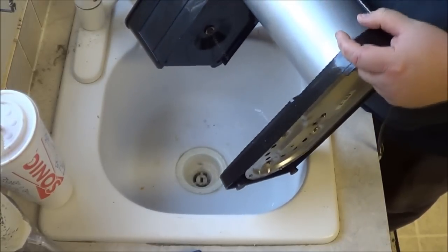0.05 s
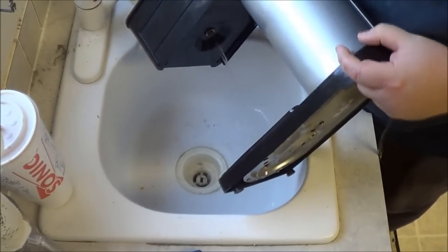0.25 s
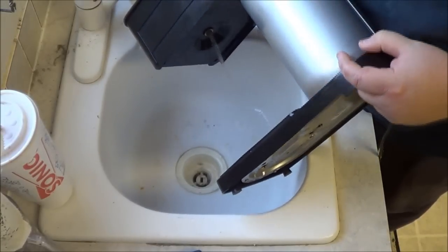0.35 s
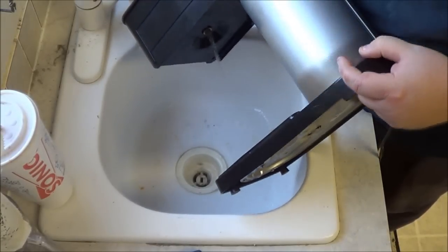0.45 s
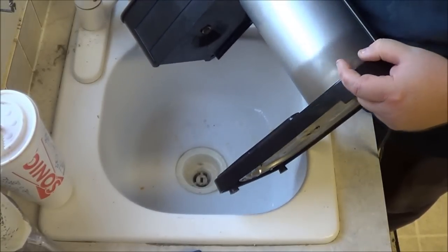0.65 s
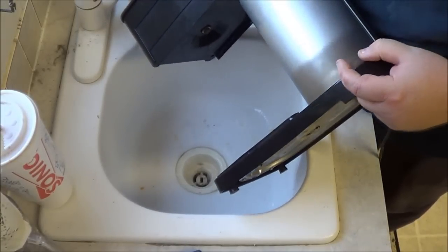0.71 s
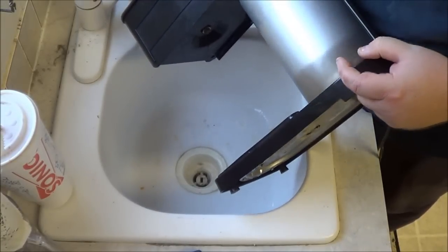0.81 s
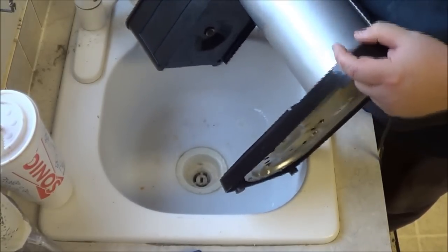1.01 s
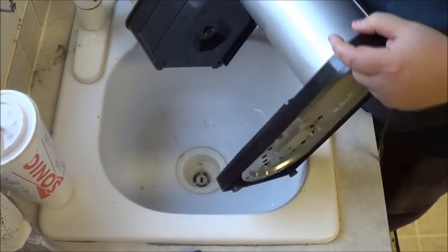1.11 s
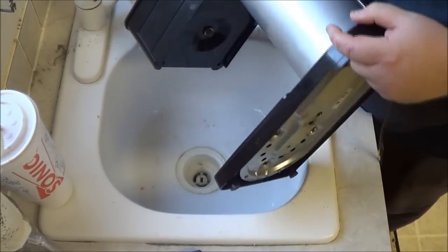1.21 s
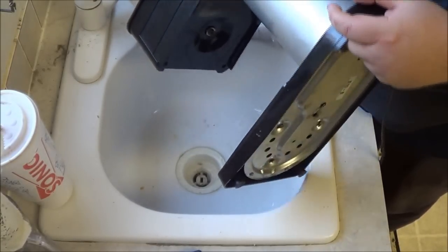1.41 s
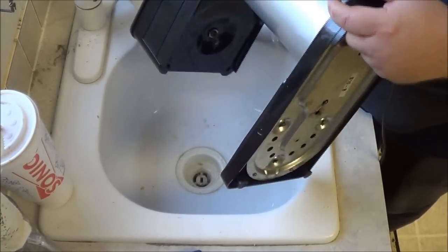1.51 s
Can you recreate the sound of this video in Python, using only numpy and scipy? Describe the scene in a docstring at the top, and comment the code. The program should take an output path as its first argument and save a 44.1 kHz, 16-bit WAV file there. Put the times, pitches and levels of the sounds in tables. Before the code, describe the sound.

A thin trickle of water drips into a kitchen sink as a plastic appliance is bumped.

```python
"""A kitchen sink, the stereo microphone close to the basin; room air and appliance hum lie behind it.
After two faint scuffs, water dribbles from a tilted coffee maker: from 0.2 s drops tick on the basin
and trapped air bubbles chirp upward. The trickle thickens, then thins after 0.8 s. The plastic housing
bumps as it is handled, hardest near 1.2 s, and a few faint drips follow. Basin and kitchen throw
the water's sound back; the bumps echo in the kitchen only."""
import sys
import numpy as np
from scipy import signal
from scipy.fft import rfft, irfft
from scipy.io import wavfile
from scipy.ndimage import uniform_filter1d

SR = 44100
rng = np.random.default_rng(int(sys.argv[2]) if len(sys.argv) > 2 else 0)


def wav_out(sig):
    """Save sig, one row per channel (or a flat mono array), as 16-bit PCM at SR to the path in sys.argv[1]."""
    wavfile.write(sys.argv[1], SR, np.round(np.clip(np.atleast_2d(sig).T, -1, 1) * 32767).astype(np.int16))


N = 68355


def amp(db):
    """Decibels to gain."""
    return 10 ** (np.asarray(db) / 20)


def unit(x):
    """Scales to rms 1."""
    return x / np.sqrt(np.mean(x ** 2) + 1e-20)


def read(points, hz):
    """Reads a table on a log-frequency axis."""
    f, value = np.transpose(points)
    return np.interp(np.log(hz + 1), np.log(f + 1), value)


def colour(x, points):
    """Gives a signal the spectrum of a table, at rms 1."""
    return unit(irfft(rfft(x) * amp(read(points, np.fft.rfftfreq(N, 1 / SR))), N))


def pair(a, b, alike):
    """Left and right channels of given likeness from two unrelated signals."""
    alike = np.clip(alike, 0, 1)
    mid, side = np.sqrt((1 + alike) / 2) * a, np.sqrt((1 - alike) / 2) * b
    return np.array([mid + side, mid - side])


def convolve(x, response):
    """Plays a mono sound through a stereo response."""
    return signal.fftconvolve(x[None], response, axes=1)[:, :N]


def play(table, source):
    """Sounds each row of an event table at the time in its first column."""
    mix = np.zeros(N)
    for start_s, *row in table:
        sound = source(*row)
        part = mix[round(start_s * SR):][:len(sound)]
        part += sound[:len(part)]
    return mix


# Spectrum of the kitchen's air (frequency [Hz], relative level [dB])
AIR_SPECTRUM = [(15, -45), (30, -22), (65, -16), (130, -9), (250, -10), (390, -7), (460, -4.5),
                (530, -12.5), (650, -10), (850, -13.5), (2000, -19.5), (4600, -24), (16000, -28.5)]
# The air across the microphone's two channels (frequency [Hz], likeness [0-1])
AIR_LIKENESS = [(50, .99), (300, 0.84), (1000, 0.22), (4000, 0.34), (12000, 1)]


def room_air(level_db=-47):
    """Room tone: a soft, low rush all around the microphone."""
    likeness = read(AIR_LIKENESS, np.fft.rfftfreq(N, 1 / SR))
    noise = irfft(pair(*rfft(rng.standard_normal((2, N))), likeness), N)
    return amp(level_db) * colour(noise, AIR_SPECTRUM)


# Tones of the appliances in the background (frequency [Hz], level [dB])
HUM_TONES = [(59.2, -53.5), (120, -72), (240, -61), (382, -70.5), (461, -52), (638, -62.5), (15734, -66.5)]


def appliance_hum(waver_depth=0.22, waver_hz=6):
    """Appliances hum in the centre of the image, each tone wavering slightly in level."""
    hz, t = np.fft.rfftfreq(N, 1 / SR), np.arange(N) / SR
    hum = np.zeros(N)
    for tone_hz, db in HUM_TONES:
        waver = unit(irfft(rfft(rng.standard_normal(N)) * np.exp(-hz / waver_hz), N))
        tone = np.sqrt(2) * np.sin(2 * np.pi * (tone_hz * t + rng.random()))
        hum += amp(db) * (1 + waver_depth * waver) * tone
    return hum


def echoes(t60, likeness, delay_s):
    """Dense, evenly coloured reflections that die band by band."""
    hz, t, noise = signal.stft(rng.standard_normal((2, SR // 2)), SR, nperseg=128)
    tail = signal.istft(noise * amp(-60 * t / read(t60, hz)[:, None]), SR, nperseg=128)[1]
    for _ in range(3):  # even out the colour
        spectrum = rfft(tail, SR)
        spectrum /= np.sqrt(uniform_filter1d(abs(spectrum) ** 2, size=400, axis=1))
        tail = irfft(spectrum, SR)[:, :SR // 2]
    tail = irfft(pair(*spectrum, read(likeness, np.fft.rfftfreq(SR, 1 / SR))), SR)[:, :SR // 2]
    return np.pad(tail, ((0, 0), (round(delay_s * SR), 0)))


# Reverberation of the kitchen (frequency [Hz], time to fall 60 dB [s])
KITCHEN_DECAY = [(200, 0.33), (1000, 0.23), (5500, 0.3), (9000, 0.33), (14000, 0.057)]
# That reverberation across the two channels (frequency [Hz], likeness [0-1])
KITCHEN_LIKENESS = [(200, 0.87), (1500, 0.45), (5000, 0.39), (12000, 0.99)]


def kitchen_echoes():
    """The walls, farther from the microphone, answer with a short, wide tail."""
    return echoes(KITCHEN_DECAY, KITCHEN_LIKENESS, delay_s=0.0071)


# Reverberation inside the basin (frequency [Hz], time to fall 60 dB [s])
BASIN_DECAY = [(800, 0.03), (3000, 0.041), (7000, 0.044), (14000, 0.014)]
# That reverberation across the two channels (frequency [Hz], likeness [0-1])
BASIN_LIKENESS = [(800, 0.92), (2000, 0.9), (5000, 0.94), (9000, 0.87), (14000, 1)]
# Strength of the basin's reflections (frequency [Hz], gain [dB])
BASIN_COLOUR = [(900, -5), (2500, 2.5), (16000, 3)]


def basin_echoes():
    """The basin's sides, close by, throw back a bright, narrow reflection almost at once."""
    tail = echoes(BASIN_DECAY, BASIN_LIKENESS, delay_s=0.0008)
    gain = amp(read(BASIN_COLOUR, np.fft.rfftfreq(SR, 1 / SR)))
    return irfft(rfft(tail, SR) * gain, SR)[:, :SR // 2]


# Dull thuds of handling (time [s], level [dB])
HANDLING_THUDS = [(0.425, -45), (0.710, -47), (1.226, -27.5)]


def thud(db, hz=46.8, rise_s=0.012, decay_s=0.045):
    """A few heavily damped swings of the whole machine."""
    t = np.arange(SR // 3) / SR
    envelope = np.exp(-t / decay_s) * (1 - np.exp(-t / rise_s))
    return -amp(db) * envelope * np.sin(2 * np.pi * hz * t)


# Modes of the plastic housing (frequency [Hz], relative level [dB], time to fall 60 dB [s])
HOUSING_MODES = [(244.4, -3.5, 0.32), (350, 4.5, 0.04), (425.6, -3, 0.12), (553, 1, 0.052),
                 (632.6, -1.5, 0.086), (786, -16, 0.13), (1140, -14.5, 0.07)]
# Bumps on it (time [s], push pitch [Hz], push level [dB], push decay [s], ring level [dB])
HOUSING_BUMPS = [ (0.4480, 313, -42, 0.019, -50), (0.6000, 219, -47, 0.021, -54),
                 (0.6820, 372, -23, 0.0086, -36), (0.7200, 310, -35, 0.018, -39.5),
                 (0.7630, 405, -32.5, 0.014, -48), (1.2265, 133, -17.5, 0.0063, -26),
                 (1.2410, 232.2, -19.5, 0.013, -34.5)]


def bump(push_hz, push_db, push_s, ring_db, rise_s=0.0014):
    """A soft push on the plastic housing, which then rings in its modes."""
    t = np.arange(SR // 3) / SR
    push = np.sin(2 * np.pi * push_hz * t) * np.exp(-t / push_s)
    ring = sum(amp(db - 60 * t / t60) * np.sin(2 * np.pi * hz * t) for hz, db, t60 in HOUSING_MODES)
    return -(amp(push_db) * push + amp(ring_db) * ring) * (1 - np.exp(-t / rise_s))


def tick(hz, octaves, db, puff_weight, puff_s):
    """A small contact: a sharp click and a dying puff of noise, in one band."""
    t, f = np.arange(4096) / SR, np.fft.rfftfreq(4096, 1 / SR)
    band = np.exp(-.5 * (np.log2((f + 1) / hz) / octaves) ** 2)
    click = np.roll(irfft(band), 12)  # a short lead-in to the peak
    puff = unit(irfft(band * rfft(rng.standard_normal(len(t))))) * np.exp(-t / puff_s)
    return amp(db) * (click / click.max() + puff_weight * puff / 2)[:len(t) // 2]


# Scuffs (time [s], centre [Hz], width [octaves], level [dB], rasp weight [-], rasp decay [s])
HOUSING_SCUFFS = [ (0.0600, 1570, 3.7, -46.5, 0.82, 0.024), (0.1300, 1700, 0.81, -36.5, 0.48, 0.0032),
                  (1.1610, 2600, 0.24, -38, 0.33, 0.012), (1.1790, 1510, 0.16, -34, 1.2, 0.0053),
                  (1.2060, 1340, 0.56, -40.5, 0.9, 0.064), (1.2285, 1190, .85, -27, 0.24, 0.0036)]


def scuffs():
    """The housing scuffs as it is handled: faint clicks, each with a brief rasp."""
    return play(HOUSING_SCUFFS, tick)


# Course of the thin trickle (time [s], relative splatter level [dB], relative spray level [dB])
TRICKLE_LEVELS = [(0, -48, -56.5), (.19, -45.5, -53), (.38, -43.5, -50), (.45, -35, -44), (.54, -41, -51),
                  (.64, -39, -46), (0.748, -38.5, -40), (.81, -73, -72), (.93, -72, -49), (1.02, -65, -72),
                  (1.55, -65, -75)]
# Its dull splatter (frequency [Hz], relative level [dB])
SPLATTER_SPECTRUM = [(60, -12), (150, 1), (260, -3.5), (600, -0.5), (1100, -7.5), (2200, -16), (5000, -35)]
# Its fine spray (frequency [Hz], relative level [dB])
SPRAY_SPECTRUM = [(1000, -1), (3000, -3), (6500, -1.5), (11000, -4), (16000, -14)]


def trickle(splatter_per_s=1400, spray_per_s=1000, spread_db=4.0):
    """Countless tiny impacts in the basin: a dull splatter and a sparser, fine spray."""
    times, splatter_db, spray_db = np.transpose(TRICKLE_LEVELS)
    layers = (splatter_db, SPLATTER_SPECTRUM, splatter_per_s), (spray_db, SPRAY_SPECTRUM, spray_per_s)
    water = np.zeros(N)
    for db, spectrum, per_s in layers:
        sizes = amp(spread_db * np.minimum(rng.exponential(1, N), 4))
        signs = rng.choice([-1, 1], N)
        impacts = sizes * signs * (rng.random(N) < per_s / SR)
        water += amp(np.interp(np.arange(N) / SR, times, db)) * colour(impacts, spectrum)
    return water / 2


# Drops (time [s], centre [Hz], width [octaves], level [dB], spray weight [-], spray decay [s])
BASIN_DROPS = [ (0.2058, 1690, 0.82, -26.5, .4, 0.0045), (0.2666, 4200, 1.2, -23, 0.77, .003),
               (0.2668, 10470, 0.2, -15.5, 0.33, 0.0015), (0.2740, 6450, 0.27, -28, .5, 0.0031),
               (0.4120, 2960, 1.31, -18, 0.65, 0.0018), (0.4480, 6060, 1.6, -32, 0.38, 0.0029),
               (0.4645, 11200, 0.65, -15.5, 0.92, 0.00067), (0.4865, 8300, 1.7, -21.5, .3, 0.008),
               (0.5025, 11300, 0.4, -21, 0.41, 0.0079), (0.5562, 7400, 0.58, -13, 0.55, 0.0017),
               (0.5730, 8450, 0.78, -24.5, .4, 0.0034), (0.5830, 8100, 0.48, -17, 0.56, 0.0058),
               (0.5996, 9200, 0.21, -7.5, .13, 0.002), (0.6090, 2660, 3.6, -22.5, 0.42, 0.014),
               (0.6180, 10100, 0.69, -9.5, 0.46, 0.001), (0.6820, 9700, 0.57, -15.5, 0.21, 0.0037),
               (0.7038, 10500, .45, -32, .3, .003), (0.7222, 10300, 0.71, -21, 0.086, 0.0022),
               (0.7255, 3500, 0.49, -20, 0.28, 0.012), (0.7262, 7370, 0.26, -17, 0.18, 0.0026),
               (0.7428, 9500, 1.3, -46, .2, .002), (0.7630, 10000, .35, -17.5, 1, 0.00085),
               (0.8722, 9600, 0.52, -18.5, .15, 0.0013), (0.8850, 7700, 0.99, -17, .3, 0.0011),
               (0.9052, 9000, 0.74, -17.5, 0.094, 0.0015), (0.9882, 13500, .2, -31, 0.27, 0.0015),
               (1.1212, 12000, 0.19, -32, .3, .0015), (1.1570, 5900, 3.3, -26.5, 0.47, 0.0016),
               (1.1805, 5960, .35, -33, .4, 0.0022), (1.5072, 5370, 0.31, -34, 0.25, .002),
               (1.5342, 6900, 1.1, -31, .4, 0.0022)]


def drops():
    """Drops land close to the microphone, each with a tick and a puff of spray."""
    return play(BASIN_DROPS, tick)


# Bubbles (time [s], start pitch [Hz], glide target [Hz], glide [s], swell [s], decay [s], level [dB])
AIR_BUBBLES = [ (0.2055, 828, 1188, 0.024, 0.00158, .011, -21.5),
               (0.2724, 1180, 4220, 0.0064, 0.0034, 0.0035, -19.5),
               (0.2726, 1020, 1800, 0.0037, 0.00052, 0.0022, -21.5),
               (0.4935, 5650, 6900, 0.0048, 0.0017, 0.0025, -28.5),
               (0.7222, 1850, 6350, 0.0049, .0033, .0014, -7.5),
               (0.7622, 2015, 2280, 0.0047, 0.00093, 0.0013, -18.5),
               (0.7652, 1800, 5330, 0.0031, 0.0015, 0.0021, -17),
               (0.8094, 2000, 7550, 0.003, 0.0021, 0.00089, -5.5),
               (0.8718, 7400, 9120, 0.0019, 0.00058, .0008, -20.5),
               (0.8835, 2590, 6000, 0.0049, 0.0034, 0.0022, -21),
               (0.8840, 2690, 2814, 0.0028, 0.0012, 0.0058, -32),
               (0.9050, 2960, 3440, 0.0026, 0.00045, .0018, -21.5),
               (0.9068, 3400, 5750, 0.004, 0.0013, 0.0015, -24),
               (0.9415, 1760, 2040, 0.0051, 0.0024, 0.0036, -33),
               (0.9460, 1210, 1600, 0.008, 0.00097, 0.013, -40.5),
               (1.1780, 1410, 1325, 0.0067, 0.0038, .006, -33),
               (1.4590, 9970, 10800, 0.0049, 0.00083, .003, -42),
               (1.5068, 4490, 4190, 0.0017, 0.00032, .003, -41.5),
               (1.5340, 2170, 2420, 0.0059, 0.0019, 0.0055, -44)]


def bubble(from_hz, to_hz, glide_s, swell_s, decay_s, db):
    """A pocket of trapped air swells and rings out, gliding fast, then drifting past its target pitch."""
    t = np.arange(SR // 8) / SR
    fast_glide = np.tanh((t / glide_s * 1.31) ** 1.79)
    slow_drift = 0.09 * np.minimum(t / glide_s, 4)
    hz = from_hz + (to_hz - from_hz) * (fast_glide + slow_drift)
    rise = np.minimum(t / swell_s, 1)
    swell = (rise + 2 * rise ** 8) / 3
    decay = np.exp(-np.maximum(t - swell_s, 0) / decay_s)
    return amp(db) * swell * decay * np.sin(2 * np.pi * np.cumsum(hz) / SR)


def scene(near_echo_db=-3.5, housing_echo_db=-5, lean_left_db=0.7):
    """At the sink: water and scuffs close and slightly left, bumps in the centre, the kitchen around."""
    basin, kitchen = basin_echoes(), kitchen_echoes()
    background = room_air() + appliance_hum()
    housing = play(HOUSING_BUMPS, bump) + play(HANDLING_THUDS, thud)
    housing = housing + amp(housing_echo_db) * convolve(housing, kitchen)
    near = scuffs() + trickle() + drops() + play(AIR_BUBBLES, bubble)
    near = near + convolve(near, basin) + amp(near_echo_db) * convolve(near, kitchen)
    balance = amp([[lean_left_db / 2], [-lean_left_db / 2]])
    return background + housing + balance * near


def record(dry):
    """The microphone's signal, cut off steeply above 16 kHz."""
    lowpass = signal.firwin(511, 16050, window=("kaiser", 9), fs=SR)
    return signal.oaconvolve(dry, lowpass[None], "same")


dry = scene()
out = record(dry)
wav_out(out)
```